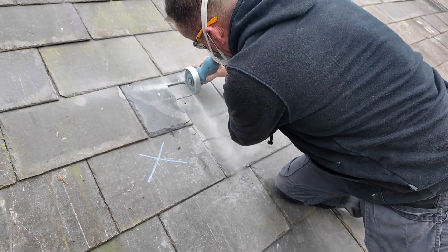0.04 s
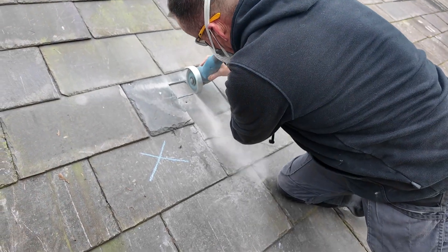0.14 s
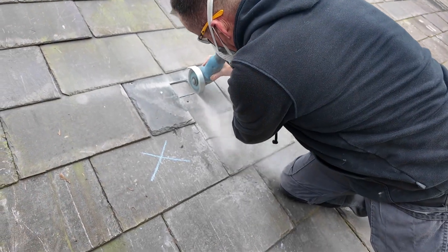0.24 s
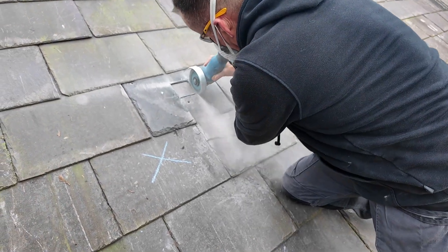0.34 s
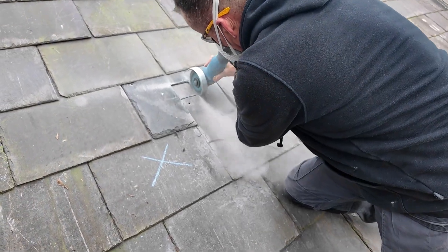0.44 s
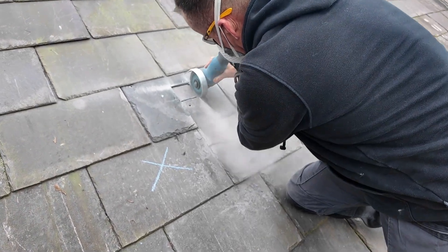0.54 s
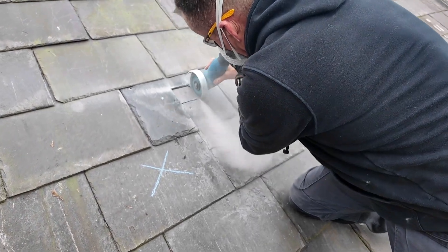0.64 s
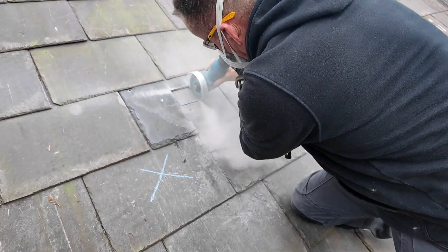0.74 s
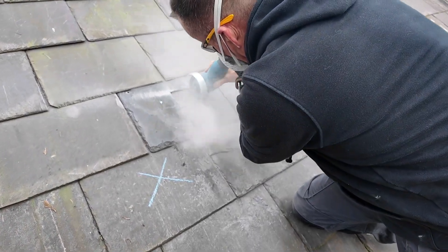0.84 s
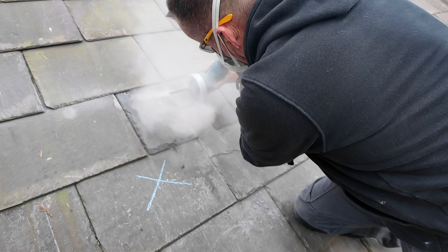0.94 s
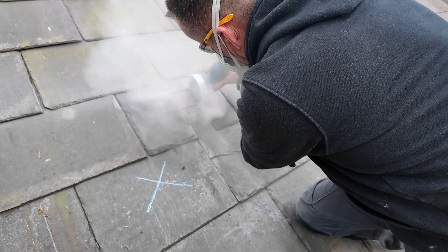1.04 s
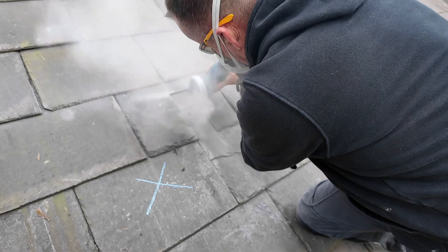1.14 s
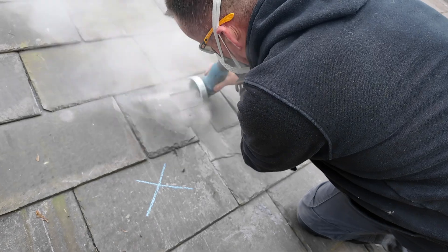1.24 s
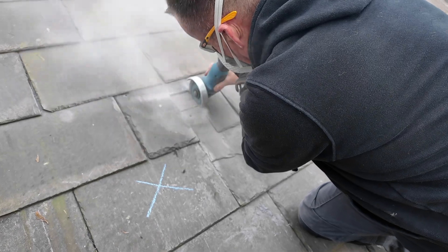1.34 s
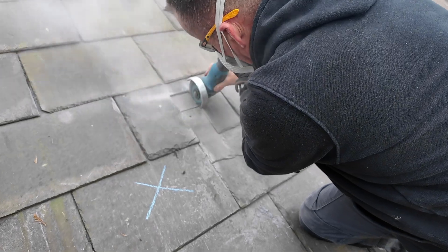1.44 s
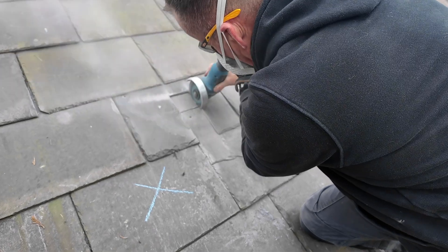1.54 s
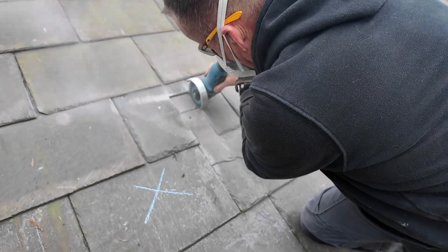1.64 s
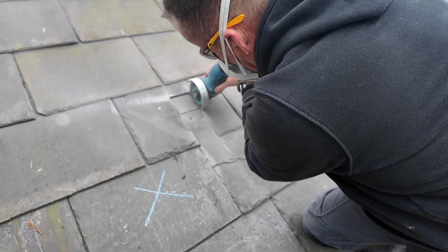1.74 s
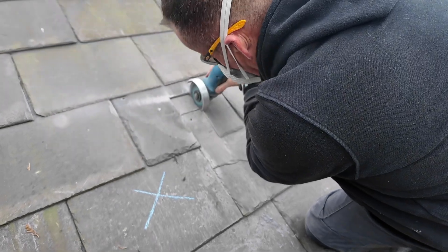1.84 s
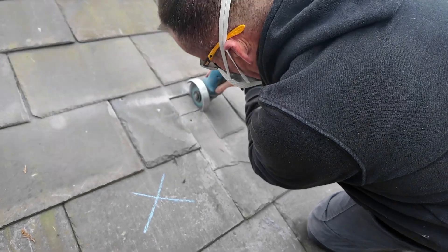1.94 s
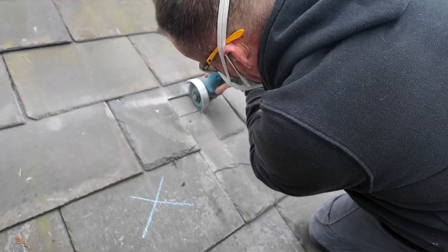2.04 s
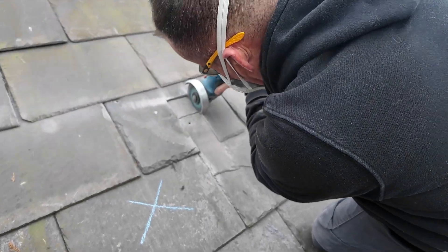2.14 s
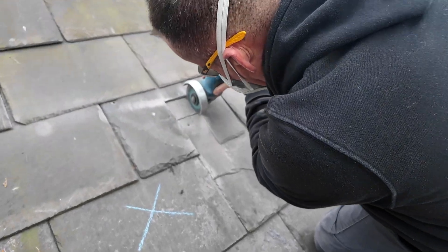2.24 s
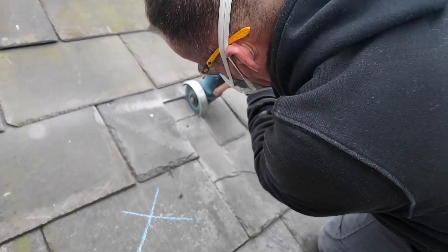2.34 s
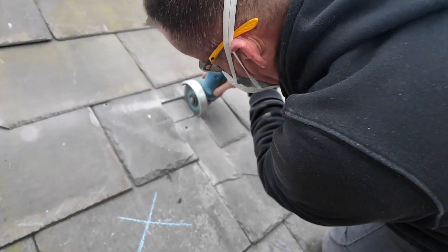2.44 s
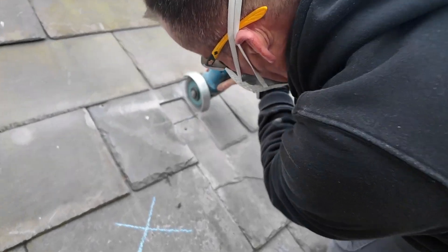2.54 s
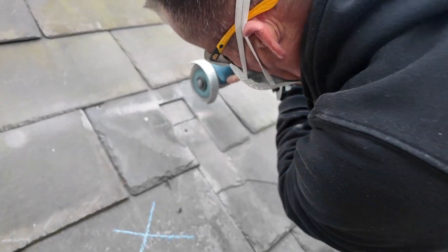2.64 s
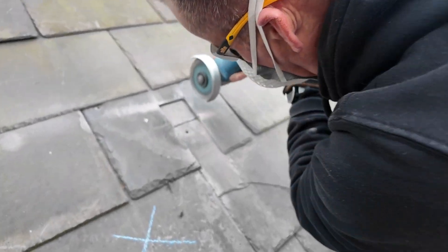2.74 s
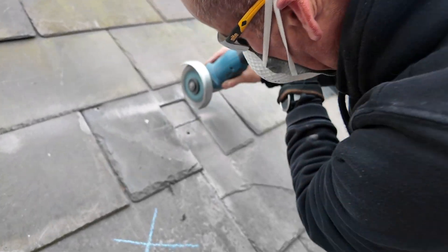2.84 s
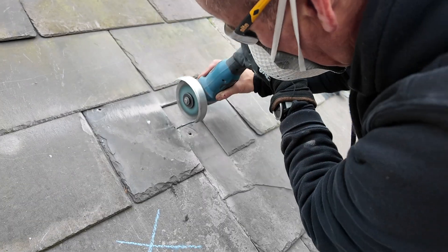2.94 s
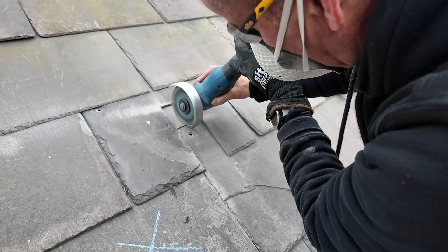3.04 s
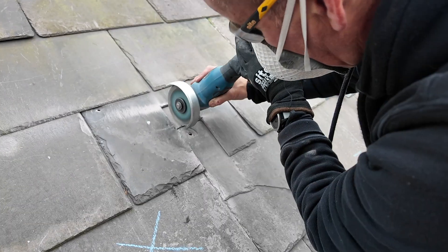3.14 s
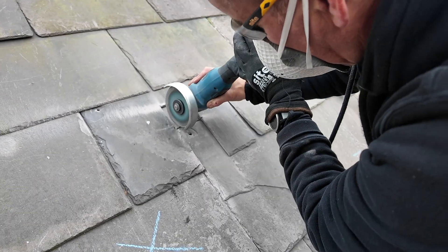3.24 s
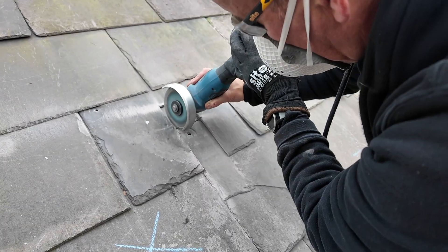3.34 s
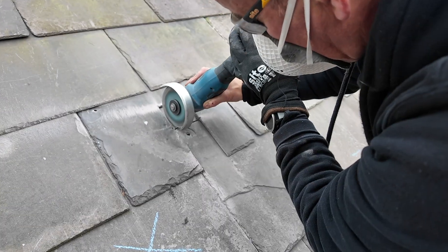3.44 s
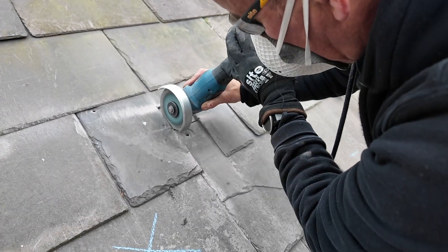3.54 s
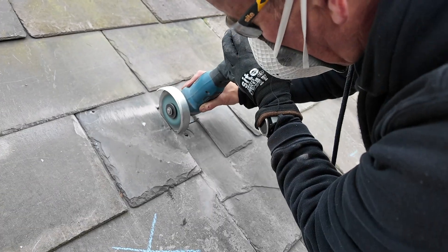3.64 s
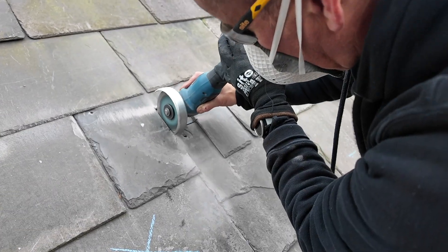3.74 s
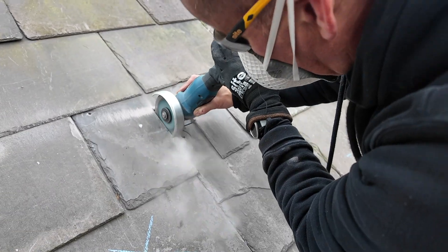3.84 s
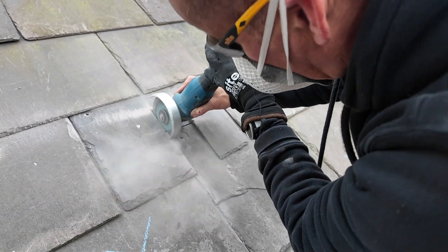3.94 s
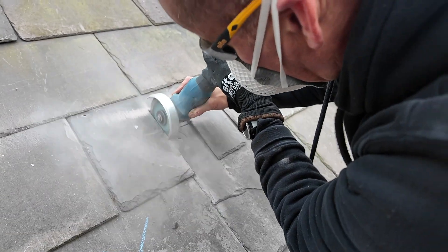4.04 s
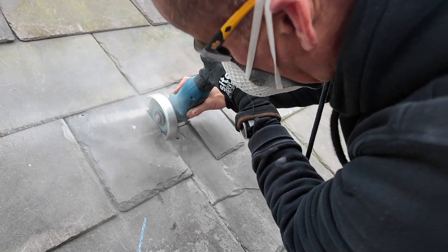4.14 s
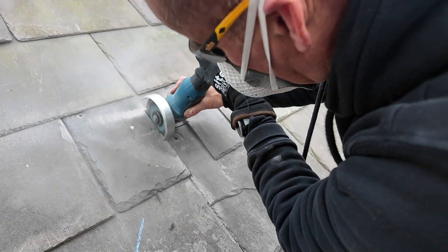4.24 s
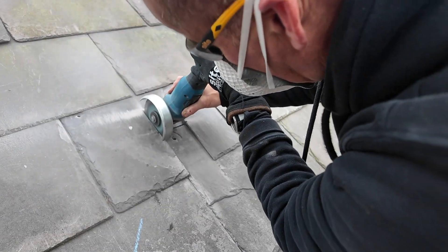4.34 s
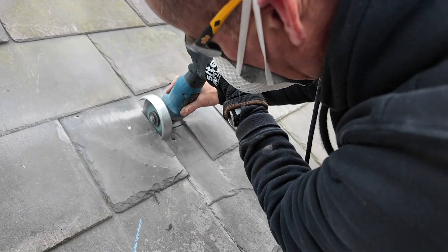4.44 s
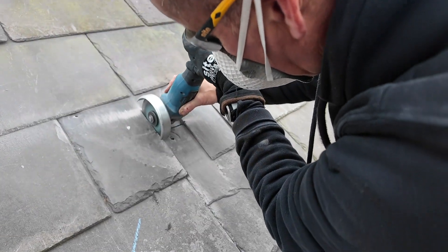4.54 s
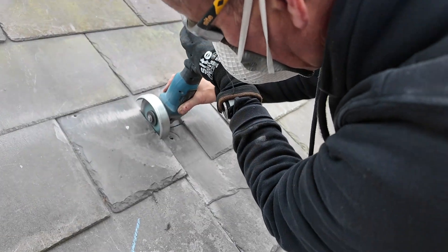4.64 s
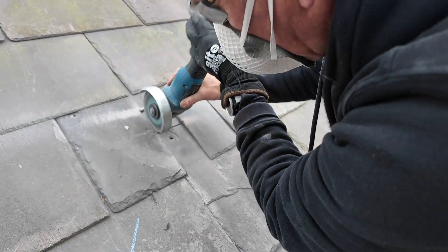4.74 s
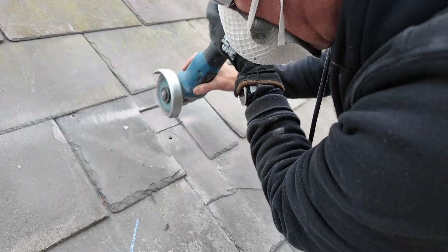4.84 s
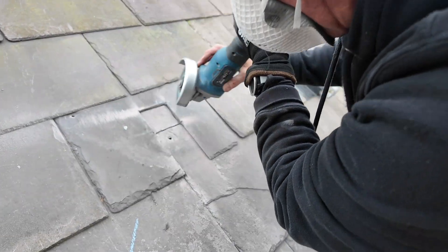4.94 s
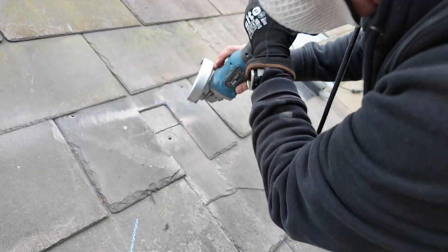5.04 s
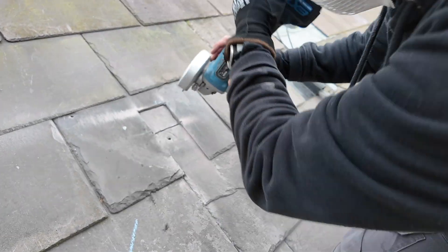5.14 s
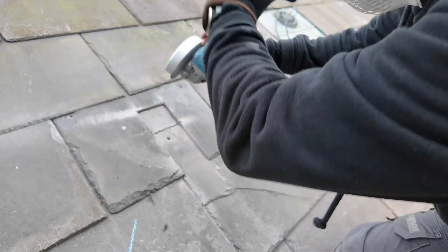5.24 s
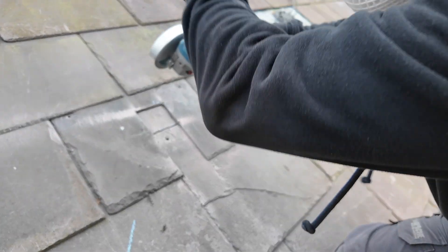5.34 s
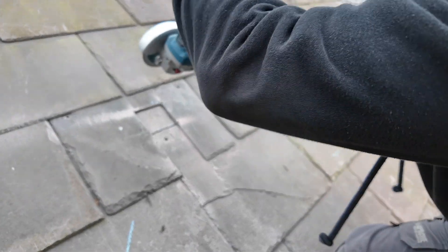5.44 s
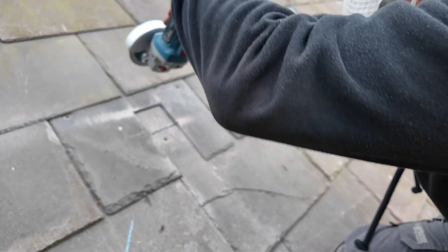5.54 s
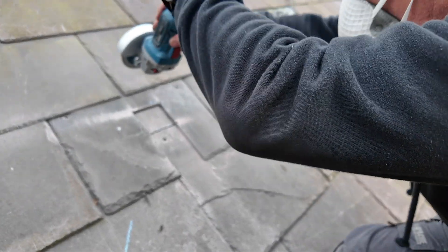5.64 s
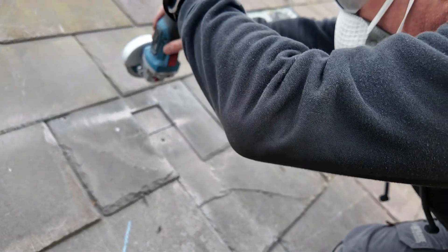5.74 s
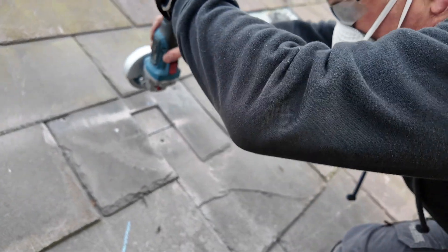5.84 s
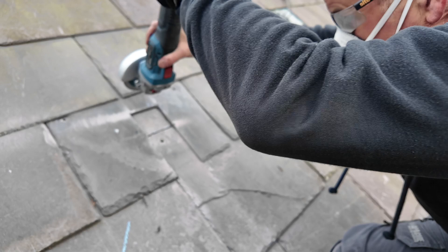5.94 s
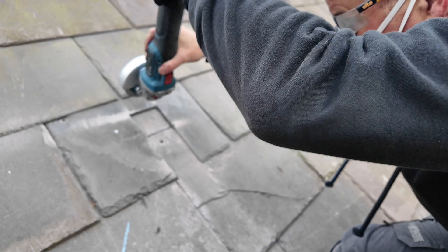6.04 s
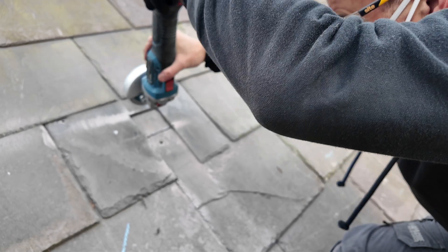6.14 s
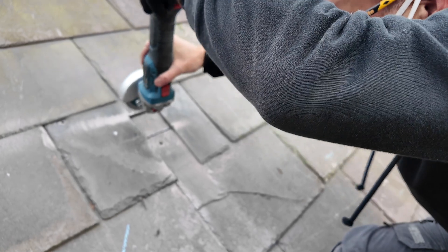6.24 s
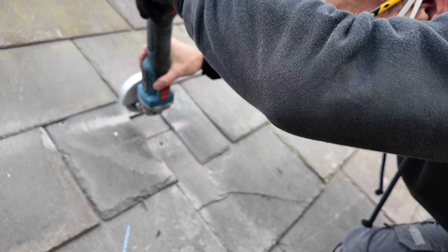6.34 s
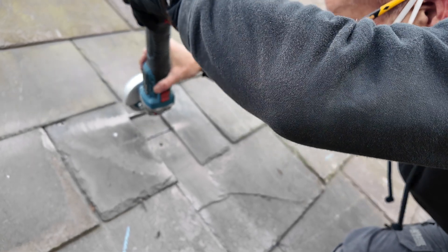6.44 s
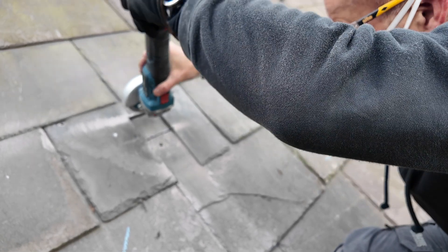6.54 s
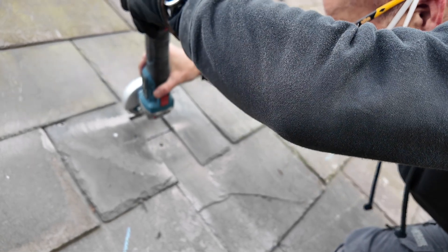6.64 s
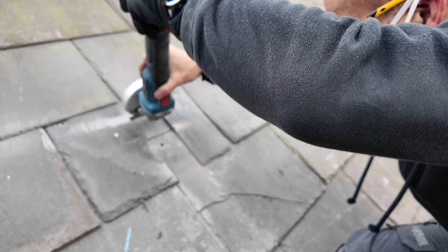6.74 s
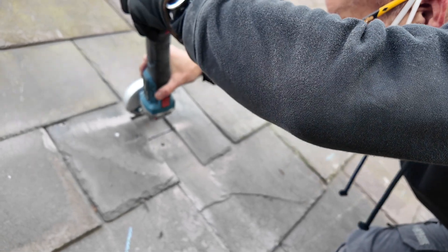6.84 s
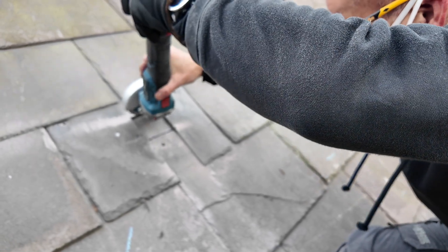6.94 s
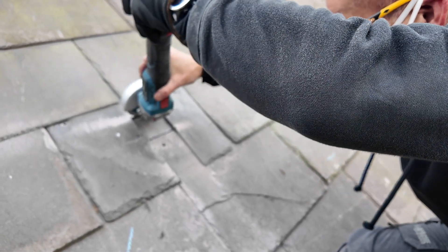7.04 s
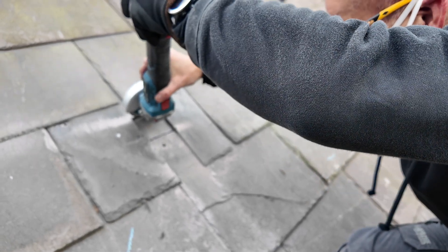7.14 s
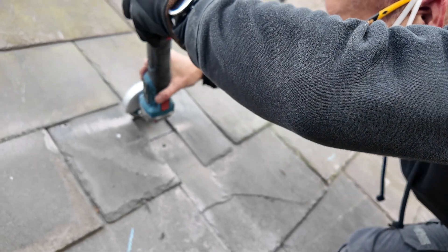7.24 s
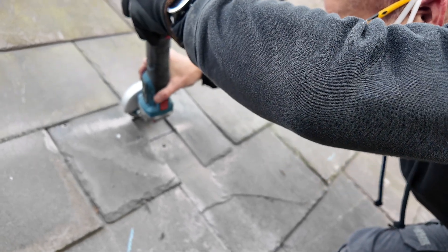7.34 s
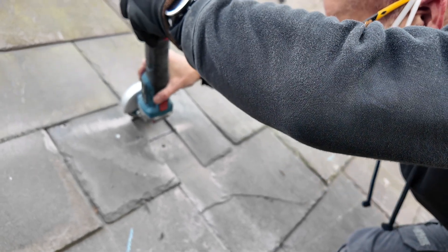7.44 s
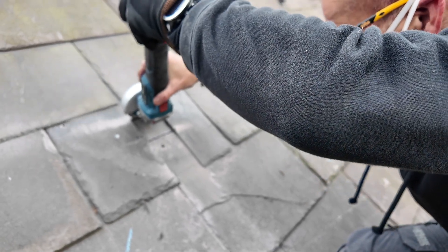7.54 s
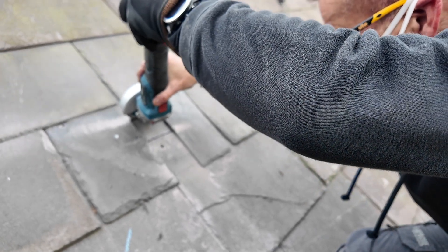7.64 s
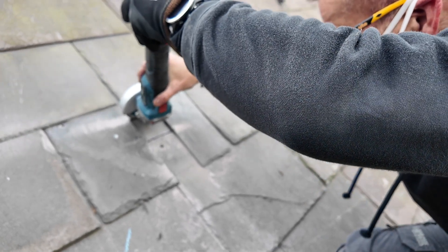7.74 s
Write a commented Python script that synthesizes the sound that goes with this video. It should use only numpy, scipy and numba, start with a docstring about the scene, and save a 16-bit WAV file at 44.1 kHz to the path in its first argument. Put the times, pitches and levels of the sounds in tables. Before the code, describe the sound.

An angle grinder cuts a roof slate outdoors, close to the microphone. It starts in a harsh, ringing shriek with gritty scraping, the pitch sagging as the disc labours. Lifted clear, it whines and rattles, then makes a shorter cut that ends in a hiss of chips. It runs free for a longer stretch before biting briefly once more.

```python
"""A shriek of disc on stone: an angle grinder cuts a roof slate outdoors, close to a mono microphone.
Under load the disc slows, drums once a turn on the slate and rings in its own modes;
lifted clear it spins back up, its gears rattle and its motor whines.
The camera's gain ducks under every bite, so the free-running motor swells back after each cut."""
import sys
import numpy as np
from scipy import signal
from scipy.fft import rfft, irfft, next_fast_len
from scipy.io import wavfile
from scipy.ndimage import uniform_filter1d, map_coordinates
from numba import njit

SR = 44100
rng = np.random.default_rng(int(sys.argv[2]) if len(sys.argv) > 2 else 0)


def wav_record(signal):
    """Record a signal, one row per channel, as 16-bit PCM in the file named by sys.argv[1]."""
    frames = np.transpose(np.atleast_2d(signal))
    bounded = np.clip(frames, -1, 1)
    # unit amplitude maps onto the largest positive 16-bit level
    quanta = np.round(bounded * 32767).astype(np.int16)
    wavfile.write(sys.argv[1], SR, quanta)


N = 343539
FREE_HZ = 120.2  # turns a second with the disc clear of the slate


def amp(db):
    """Decibels to gain."""
    return 10 ** (np.asarray(db) / 20)


def unit(x):
    """Scaled to rms 1."""
    return x / np.sqrt(np.mean(x ** 2) + 1e-20)


def curves(rows):
    """One value per sample for each column after the time."""
    times, *columns = np.transpose(rows)
    return [np.interp(np.arange(N) / SR, times, column) for column in columns]


def wobble(rate):
    """A random curve of rms 1, rate knots a second."""
    at = np.arange(N) * rate / SR
    knots = rng.standard_normal(int(at[-1]) + 2)
    return unit(np.interp(at, np.arange(len(knots)), knots))


def swell(start, end):
    """A rounded rise and fall between two times."""
    progress = np.clip((np.arange(N) / SR - start) / (end - start), 0, 1)
    return np.sqrt(np.abs(np.sin(np.pi * progress)))


def blend(a, b, share):
    """Equal-power fade from a to b."""
    share = np.clip(share, 0, 1)
    return np.sqrt(1 - share) * a + np.sqrt(share) * b


def filtered(x, response):
    """x times a complex response of frequency."""
    size = next_fast_len(N + SR // 4)
    return irfft(rfft(x, size) * response(np.fft.rfftfreq(size, 1 / SR)), size)[:N]


def coloured(x, points):
    """x shaped by (f/Hz, level/dB) points on a log axis, at rms 1."""
    f, db = np.transpose(points)
    return unit(filtered(x, lambda hz: amp(np.interp(np.log(hz + 1), np.log(f), db, left=-70))))


def by_lean(x, table, lean):
    """x coloured between a table's straight and leaning columns."""
    rows = np.array(table)
    return (1 - lean) * coloured(x, rows[:, [0, 1]]) + lean * coloured(x, rows[:, [0, 2]])


def resonant(x, modes):
    """x through disc modes (f/Hz, width/Hz, level/dB), with a gain of 1 for white noise."""
    def response(f):
        body = sum(amp(db) * 1j * f * width / (hz * hz - f * f + 1j * f * width)
                   for hz, width, db in modes)
        # the disc radiates best in the middle treble
        body = body / (1 + (2400 / (f + 1)) ** 6) / (1 + (f / 14000) ** 4)
        return body / np.sqrt(np.mean(np.abs(body) ** 2))
    return filtered(x, response)


def disc_speed(spin_up_s=0.135):
    """Turns per second: dragged down in each cut, springing back after it."""
    # the slate slows the disc, one list for each cut: t/s, turning rate/Hz
    cuts = [
        [(0, 114), (0.06, 112.2), (0.24, 103.4), (0.42, 106.6), (0.51, 106.5), (0.69, 103), (0.96, 95.9),
         (1.14, 94), (1.23, 89.4), (1.32, 89.6), (1.41, 98.3), (1.67, 110.2), (1.86, 111.6), (2.04, 104.2),
         (2.13, 105.7), (2.22, 112.6), (2.33, 111.5), (2.62, 115.7)],
        [(3.68, 120.1), (3.86, 116.5), (3.94, 114), (4.04, 109), (4.16, 111.4), (4.44, 109.8), (4.64, 110.6),
         (4.74, 109.8), (4.87, 113)],
        [(7.32, 120.1), (7.5, 118.5), (7.62, 118.8), (7.79, 116.1)],
    ]
    t, speed = np.arange(N) / SR, np.full(N, FREE_HZ)
    for cut in cuts:
        start, end = cut[0][0], cut[-1][0]
        sag = (FREE_HZ - curves(cut)[0]) * np.exp(-np.maximum(t - end, 0) / spin_up_s)
        speed = np.where(t >= start, FREE_HZ - sag, speed)
    return speed


def bites(release_s=0.017, tremor_db=1.27):
    """Gains of force, grit and drumming: each bite rises, holds and lets go, and the hand shakes."""
    # the rim meets the slate: t/s, length/s, attack/s, force/dB, grit re force/dB, drumming re force/dB
    contacts = [ (0.0, 1.545, 0.00038, -12.5, -8.5, -13), (1.512, 0.58, 0.02, -16.5, -14, -14.5),
                (2.1, 0.6, 0.02, -16.5, -18, -29), (1.621, 0.1, 0.013, -14.5, -6, -16.5),
                (1.717, 0.1, 0.02, -14, -2, -15.5), (1.818, 0.3, 0.12, -14, -11, -18),
                (2.201, 0.18, 0.022, -9, -23, -17), (2.265, 0.14, 0.054, -5, -28, -22),
                (2.408, 0.06, 0.018, -8.5, -22, -32), (2.493, 0.12, 0.048, -2, -19, -40),
                (3.419, 0.015, 0.011, -15.5, -27, 2.5), (3.68, 0.041, 0.0018, -10.5, -23, -16),
                (3.745, 1.006, 0.04, -11.5, -17, -16), (4.66, 0.15, 0.09, -9, -14, -29),
                (4.819, 0.029, 0.03, -0.5, -1, -29.5), (7.319, 0.03, 0.03, -25, -23, 2),
                (7.367, 0.035, 0.017, -14.5, -26, -15), (7.384, 0.16, 0.13, -13.5, -26, -17),
                (7.607, 0.066, 0.008, -14.5, -25, -12), (7.672, 0.1, 0.04, -14, -25, -10.5)]
    t, gains = np.arange(N) / SR, np.zeros((3, N))
    for start, length, attack, force_db, grit_db, drum_db in contacts:
        end = start + length
        near = slice(*np.searchsorted(t, [start, end + .5]))
        rise = np.minimum((t[near] - start) / attack, 1)
        fall = np.exp(-np.maximum(t[near] - end, 0) / release_s)
        levels = amp([force_db, force_db + grit_db, force_db + drum_db])
        gains[:, near] = np.maximum(gains[:, near], np.outer(levels, rise * fall))
    return gains * amp(tremor_db * wobble(22))


def rim(turns, memory, alike, segments=9, points=45):
    """The rough rim passes again each turn, a little worn; its segments resemble each other."""
    fresh = rng.standard_normal((int(turns[-1]) + 40, segments * points))
    worn = signal.lfilter([1], [1, -memory], fresh, axis=0)[20:]
    profile = signal.lfilter([1], [1, -alike], worn.reshape(-1, points), axis=0).ravel()
    return unit(map_coordinates(profile, [turns * segments * points], order=3))


def shriek(turns, drive, lean, load, damping=0.64, bright_hz=9300, touch_brightness=0.56):
    """The rim drives the disc's modes, brighter under load; two high ones ring on after it lifts."""
    # disc modes: f/Hz, width before the damping factor/Hz, level held straight/dB, level leaning/dB
    disc_modes = [(3220, 200, -13, -9), (3580, 100, -8, -16), (4205, 90, -10, -1), (4430, 130, -5, -11),
                  (4880, 150, -5, 0), (5700, 100, -2, 2), (6743, 70, 4, -2), (7340, 140, -9, -13),
                  (8468, 70, -6, -3), (8868, 65, -5, -4), (10070, 120, -16, -6), (11340, 70, -13, -13),
                  (11880, 120, -23, -14), (13420, 65, -19, -22), (13750, 65, -27, -15),
                  (14800, 60, -25, -22), (15560, 70, -23, -24)]
    modes = np.array(disc_modes) * [1, damping, 1, 1]
    straight_drive = drive * np.sqrt(1 - lean) * rim(turns, memory=0.28, alike=0.0087)
    leaning_drive = drive * np.sqrt(lean) * rim(turns, memory=0.25, alike=0.037)
    disc = resonant(straight_drive, modes[:, [0, 1, 2]]) + resonant(leaning_drive, modes[:, [0, 1, 3]])
    lasting = [(hz, 11, db) for hz, _, db, _ in disc_modes if 8000 < hz < 9500]
    disc += amp(-22) * resonant(drive * rng.standard_normal(N), lasting)
    dull = filtered(disc, lambda hz: 1 / (1 + (hz / bright_hz) ** 20))
    return dull + (disc - dull) * (touch_brightness + (1 - touch_brightness) * load)


def scrape(turns, press):
    """A deep slot damps the disc and leaves a broad scrape."""
    # the disc buried in the slate: f/Hz, level/dB
    spectrum = [(900, -19), (1800, -5.5), (2500, -4.5), (3100, 8), (4000, 5.5), (4600, 6), (5400, 2.5),
                (5900, 5.5), (6700, 5.5), (7100, 0.5), (8800, -1), (9400, -103), (15800, -48)]
    return coloured(press * rim(turns, memory=0.81, alike=0.1), spectrum)


def chips(turns, press, grit):
    """The rim throws grit as it bites, and a spray of chips where the edge crumbles."""
    # the edge crumbles: start/s, end/s, level/dB
    sprays = [(0.13, 0.273, -31), (4.662, 4.827, -18)]
    # hiss of flying chips: f/Hz, level/dB
    spectrum = [(6000, -26), (8500, 2), (9900, 2), (10600, 3), (11800, 10), (13000, 2), (14300, 2),
                (15700, 0.5)]
    flow = grit + sum(amp(db) * swell(start, end) for start, end, db in sprays)
    return flow * coloured(press * rim(turns, memory=0.42, alike=0.22), spectrum)


def drumming(turns, waver_db, count):
    """Harmonics of the turning rate, each drifting as the contact shifts; the high ones blur."""
    uneven = turns + 0.0022 * wobble(70)  # the disc catches and slips a little
    harmonics = np.zeros(N)
    for k in range(1, count + 1):
        level = amp(waver_db * (wobble(2.44) + 0.41 * wobble(11)))
        harmonics += level * np.sin(2 * np.pi * (k * uneven + rng.random()) + 0.12 * wobble(14))
    return unit(harmonics)


def slate_drum(turns, press, lean):
    """The slate is struck once a turn and rubbed by the rough rim."""
    # the slate under the rim: f/Hz, level held straight/dB, level leaning/dB
    spectrum = [(257, 1, -23), (405, -4, -14.5), (572, -1, 6.5), (726, -1.5, -3), (930, -4.5, 3.5),
                (1030, -3.5, 4.5), (1244, 3, 2), (1620, -6, -7.5), (2030, -7.5, 4), (2260, -2, 2.5),
                (3160, -2, -45), (5000, -26, -30)]
    beats = drumming(turns, waver_db=4.0, count=24)
    rubbing = press * rim(turns, memory=0.77, alike=0.05)
    return by_lean(blend(beats, rubbing, 0.5), spectrum, lean)


def roof_thrum(turns, lean):
    """The roof below the cut hums and rumbles with the lowest harmonics of the disc."""
    # the battens: f/Hz, level held straight/dB, level leaning/dB
    spectrum = [(50, -41, -30), (107, -8.5, -7.5), (210, -0.5, 0.5), (324, -3.5, 12.5), (426, -11, -28),
                (556, -26, -26)]
    beats = drumming(turns, waver_db=2.1, count=4)
    return by_lean(blend(beats, rng.standard_normal(N), 0.35), spectrum, lean)


def cutting(turns, sag_hz, full_load_hz=10.9, touch_shake=0.18, buried_drum_db=4.5):
    """The rim rings the disc, scrapes the slate, throws grit and drums on the roof."""
    # the hand holds the disc in the cut: t/s, free ringing/0-1, sideways lean/0-1, pressure/dB
    grip = [(0, 0.65, 0.12, -0.5), (0.2, 0.54, 0.06, -1.5), (0.48, 0, 0.2, -5), (0.66, 0.2, 0.28, -4),
            (0.77, 0.33, 0.13, 5), (1.1, 0.23, 0, 3.5), (1.5, 0.87, 0.33, 6), (2.0, 0.85, 0, 4),
            (2.6, 1, 0.12, -7), (3.43, 0.34, 0.5, 2), (3.7, 0.97, 0.46, 0), (3.78, 0.99, 0.65, -1.5),
            (3.96, 0.94, 0.73, 3.5), (4.15, 0.64, 0.92, 0.5), (4.4, 0.72, 1, 3), (4.78, 0.92, 0.95, -3),
            (7.4, 1, 0, 7)]
    force, grit, knock = bites()
    ringing, lean, pressure_db = curves(grip)
    ringing, lean = np.clip([ringing, lean], 0, 1)
    depth = 1 - ringing
    friction = force * amp(pressure_db)
    load = np.tanh(2 * sag_hz / full_load_hz)
    # a slightly untrue disc presses hardest once a turn, most of all in a shallow cut
    untrue_db = (-0.9 + 3.5 * ringing) * np.cos(2 * np.pi * turns)
    press = unit(amp(untrue_db + 0.46 * wobble(45) + wobble(900)))
    disc = shriek(turns, amp(-1.6) * friction * np.sqrt(ringing) * press, lean, load)
    slot = amp(0.6) * friction * np.sqrt(depth) * scrape(turns, press)
    debris = amp(-3) * np.sqrt(1 - 0.94 * ringing) * chips(turns, press, grit * amp(pressure_db))
    # the harder the disc labours and the deeper it sits, the more the slate shakes
    shake = knock * (touch_shake + np.tanh(sag_hz / full_load_hz))
    slate = shake * amp(0.91 * pressure_db + buried_drum_db * depth) * slate_drum(turns, press, lean)
    roof = amp(-11.5) * knock * (touch_shake + load) * roof_thrum(turns, lean)
    return disc + slot + debris + slate + roof


def squeals(turns):
    """Brief strong tones when the slate flexes in step with the disc."""
    # the slate locks on: start/s, end/s, multiple of the turning rate, level/dB
    locks = [(0.0, 0.17, 2, -35), (0.135, 0.69, 9, -31), (0.403, 0.88, 2, -32.5), (0.69, 0.894, 9, -22),
             (0.85, 1.36, 2, -33), (1.5, 2.15, 2, -40), (1.37, 1.46, 13, -28), (3.417, 3.459, 2, -32),
             (3.42, 3.459, 9, -33), (3.69, 3.758, 9, -34), (3.704, 3.92, 2, -39), (3.897, 3.983, 18, -28),
             (4.05, 4.72, 4, -43), (4.1, 4.68, 19, -37), (7.63, 7.79, 2, -38), (7.629, 7.675, 11, -26),
             (7.696, 7.784, 11, -27)]
    tones = np.zeros(N)
    for start, end, multiple, db in locks:
        flutter = amp(0.92 * wobble(50))
        phase = 2 * np.pi * round(multiple) * turns + 0.32 * wobble(60)
        tones += amp(db) * swell(start, end) * unit(flutter * np.sin(phase))
    return tones


def backlash(turns, skip_db, scatter_db, fade_s, bed):
    """Envelope of loose gear teeth: a knock each turn, unevenly strong and weak by turns."""
    index = np.arange(1, int(turns[-1]))
    jitter, slip, scatter = rng.standard_normal((len(index), 3)).T
    onsets = np.interp(index + 0.13 * jitter, turns, np.arange(N)).astype(int)
    strong = (index + np.cumsum(slip > 1.3)) % 2  # the pattern slips now and then
    knocks = np.bincount(onsets, amp(skip_db * strong + scatter_db * scatter), N)
    t = np.arange(SR // 25) / SR
    burst = np.exp(-t / fade_s) * (1 - np.exp(-t / 0.0015))
    return unit(bed + unit(signal.fftconvolve(knocks, burst)[:N].clip(0)))


def teeth(knocks):
    """The gear teeth clash in a rough burst of noise at each knock."""
    return knocks * amp(0.66 * wobble(1100)) * rng.standard_normal(N)


def gear_rattle(knocks, away):
    """The gearbox rattles, changing colour as it turns from the microphone."""
    # gearbox facing the microphone: f/Hz, level/dB
    on_axis = [(2500, -7), (4600, -10), (5150, 1.5), (6100, 6), (6800, 0.5), (7150, -4.5), (7800, -3),
               (9200, -26), (10100, -6), (11100, -28), (11850, -12), (12700, -39), (15700, -50)]
    # gearbox turned away: f/Hz, level/dB
    off_axis = [(2500, -54), (4100, -6.5), (4600, -5), (4950, -0.5), (5150, 6), (5450, 0.5), (5680, 5),
                (6100, 0), (6680, 2.5), (7150, -17.5), (8400, -10.5), (9200, -15.5), (12700, -26.5),
                (15700, -37)]
    return blend(coloured(teeth(knocks), on_axis), coloured(teeth(knocks), off_axis), away)


def casing_buzz(knocks):
    """The casing rings with the gear knocks and a little steady noise."""
    # casing resonances: f/Hz, level/dB
    spectrum = [(1200, -21), (2000, -3), (2400, 2), (3000, 6), (3300, 1), (3750, 3), (4150, 8.5),
                (4450, 3.5), (4800, -3), (6500, -27)]
    return coloured(blend(teeth(knocks), rng.standard_normal(N), 0.21), spectrum)


def fan_air(knocks):
    """The fan blows a steady rush that pulses slightly with the gears."""
    # air from the vents: f/Hz, level/dB
    spectrum = [(25, -31), (70, -18), (125, -13), (180, -14), (260, -2), (380, -7.5), (560, 3), (780, -1),
                (980, 1), (1350, -1), (1600, -9), (2200, -23), (4000, -29)]
    return coloured(blend(teeth(knocks), rng.standard_normal(N), 0.82), spectrum)


def motor_whine(turns, away, gear_ratio=3.562):
    """Wavering harmonics of the motor shaft, which is geared to spin faster than the disc."""
    # motor tones: multiple of the shaft rate, level facing the microphone/dB, level turned away/dB
    tones = [(4, -37.5, -50), (8, -46.5, -39), (12, -52, -32.5), (16, -62, -35)]
    shaft = 2 * np.pi * gear_ratio * turns + 0.038 * wobble(68)
    return sum(amp(front + (back - front) * away + 1.7 * wobble(25)) * np.sin(k * shaft)
               for k, front, back in tones)


def running(turns, facing_echo=0.4):
    """Gears, casing, fan and motor at close range, with a short echo off the slates."""
    # the tool is lifted and turned over: t/s, gearbox turned away/0-1, roof echo delay/ms,
    # level as the arm hides or bares the gearbox/dB
    pose = [(2.75, 0.5, 0.2, -1), (3.35, 0.16, 0.17, -0.5), (3.55, 0.22, 0.2, -2), (4.9, 0.4, 0.24, 3),
            (5.38, 0.72, 0.27, -4), (5.58, 0.45, 0.83, -1), (6.0, 0.73, 0.445, 0), (7.3, 1, 0.2, -1)]
    away, echo_ms, bared_db = curves(pose)
    vent_db = 3.5 * away  # the vents face the microphone as the gearbox turns away
    knocks = backlash(turns, skip_db=12.5, scatter_db=1.26, fade_s=0.0048, bed=0.46)
    gears = amp(-23.5 + bared_db) * gear_rattle(knocks, away)
    casing = amp(-32 + vent_db + 0.32 * bared_db) * casing_buzz(knocks)
    air = amp(-40.5 + vent_db) * fan_air(knocks)
    whine = amp(2 + 1.05 * bared_db) * motor_whine(turns, away)
    direct = gears + casing + air + whine
    echo = map_coordinates(direct, [np.arange(N) - echo_ms * SR / 1000], order=3)
    echo_share = facing_echo * (1 - away)
    return (direct + echo_share * echo) / np.sqrt(1 + echo_share ** 2)


def whistles(turns):
    """Narrow breathy bands swell in the cut, and in the free-running rasp chatter with the gears."""
    # bands of noise: start/s, end/s, f/Hz, width/Hz, level/dB, chattering share/0-1
    bands = [(0.877, 1.128, 2980, 260, -16.5, 0), (1.118, 1.587, 4490, 380, -12, 0.1),
             (1.156, 1.463, 2480, 450, -18.5, 0.02), (4.98, 5.42, 3780, 220, -29.5, 1),
             (5.321, 5.84, 1330, 350, -39.5, 0.3)]
    chatter = backlash(turns, skip_db=15, scatter_db=6, fade_s=0.006, bed=0.2)
    sound = np.zeros(N)
    for start, end, hz, width, db, share in bands:
        band = unit(filtered(rng.standard_normal(N), lambda f: 1 / (1 + (2 * (f - hz) / width) ** 2)))
        sound += amp(db) * swell(start, end) * band * unit(blend(1, chatter, share))
    return sound


def bumps(thud_hz=127, t60_s=0.21):
    """The roof gives a dull thud as weight shifts on it."""
    # soft knocks on the roof: t/s, level/dB
    knocks = [(1.53, -36), (5.24, -40), (6.58, -40), (7.329, -41.5)]
    t, hits = np.arange(SR // 4) / SR, np.zeros(N)
    for start, db in knocks:
        hits[int(start * SR)] = amp(db)
    thud = np.sin(2 * np.pi * thud_hz * t) * amp(-60 * t / t60_s) * (1 - np.exp(-t / 0.0074))
    return signal.fftconvolve(hits, thud)[:N]


@njit
def follow(wanted, attack_s, release_s):
    """Tracks a value with one time constant for rising and another for falling."""
    out, state = np.empty_like(wanted), wanted[0]
    for i in range(len(wanted)):
        state += (wanted[i] - state) / (SR * (attack_s if wanted[i] > state else release_s))
        out[i] = state
    return out


def scene():
    """On the roof, at one close microphone: the cut and the tool both follow the turning disc."""
    speed = disc_speed()
    turns, sag_hz = np.cumsum(speed) / SR, FREE_HZ - speed
    mono = cutting(turns, sag_hz) + amp(3) * squeals(turns) + running(turns) + whistles(turns) + bumps()
    return np.array([mono, mono])


def record(dry):
    """The camera's gain ducks under each bite and creeps back; nothing passes above its band limit."""
    threshold_db, slope, top_hz = -23.5, 0.82, 15780
    level_db = 10 * np.log10(np.abs(uniform_filter1d(dry[0] ** 2, size=220)) + 1e-12)
    duck_db = slope * np.maximum(level_db - threshold_db, 0)
    gain = amp(-follow(duck_db, attack_s=0.009, release_s=0.39))
    return np.array([filtered(gain * channel, lambda hz: hz < top_hz) for channel in dry])


dry = scene()
out = record(dry)
wav_record(out)
```